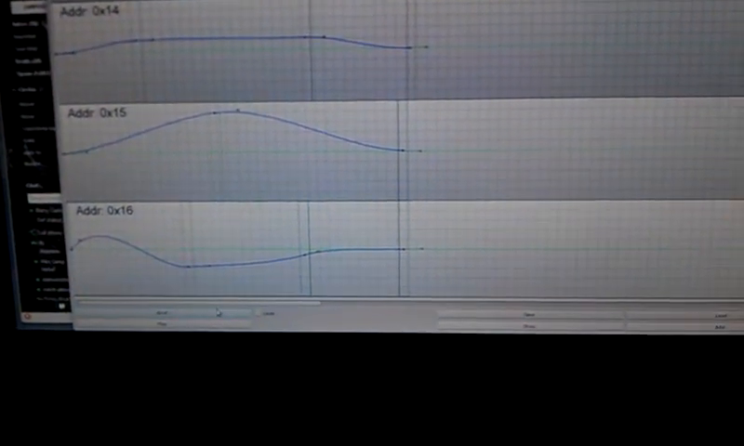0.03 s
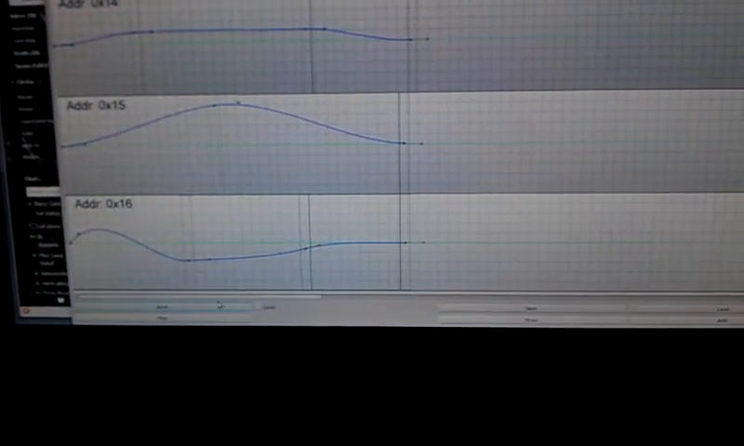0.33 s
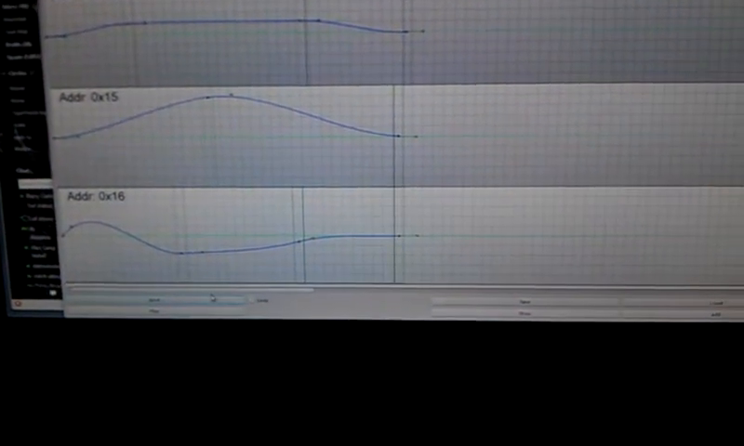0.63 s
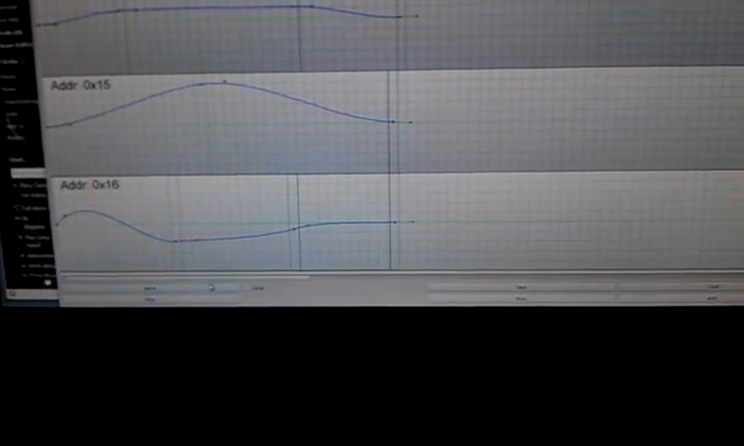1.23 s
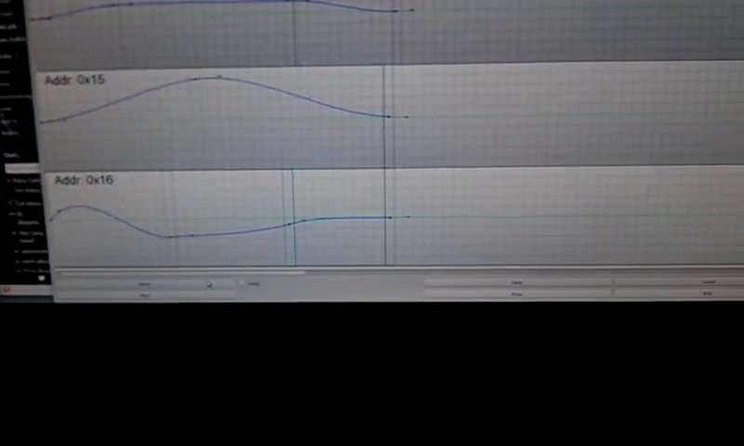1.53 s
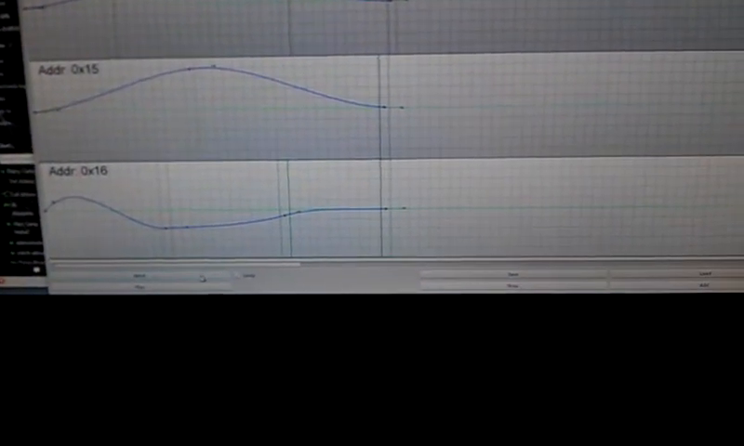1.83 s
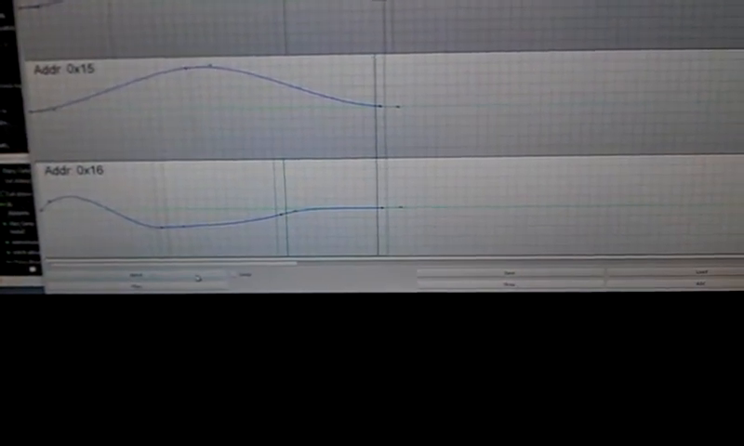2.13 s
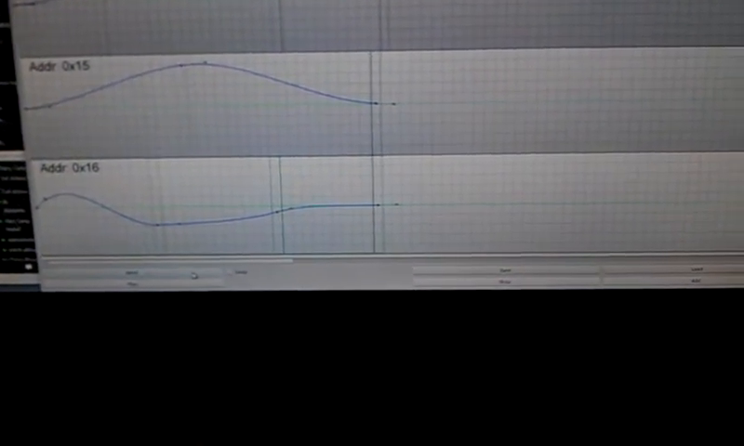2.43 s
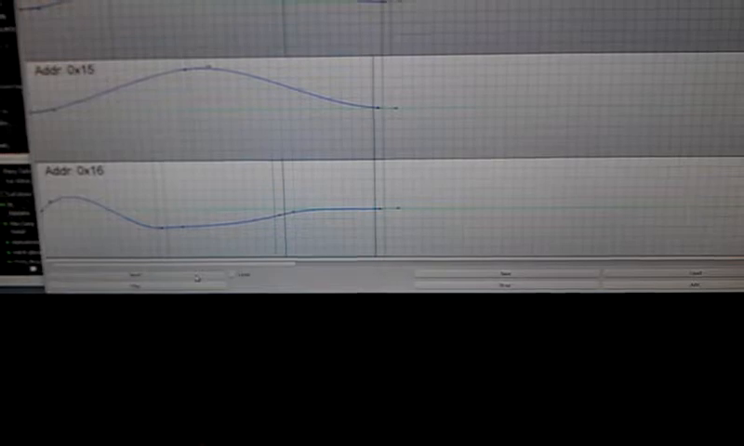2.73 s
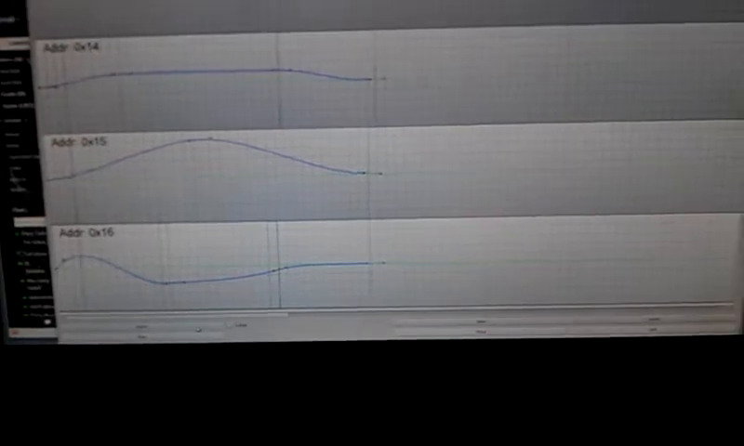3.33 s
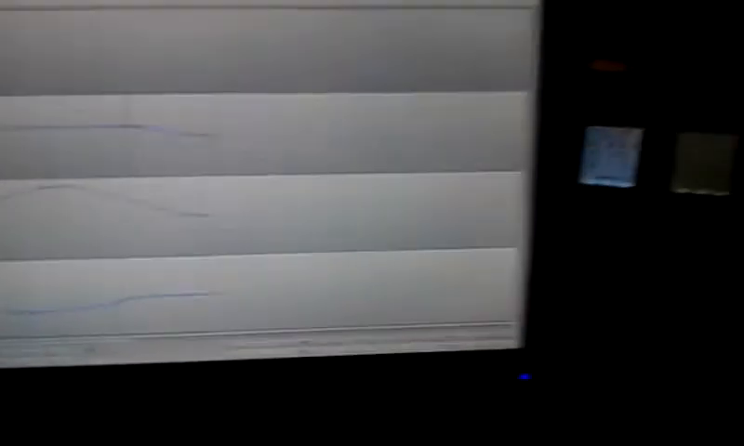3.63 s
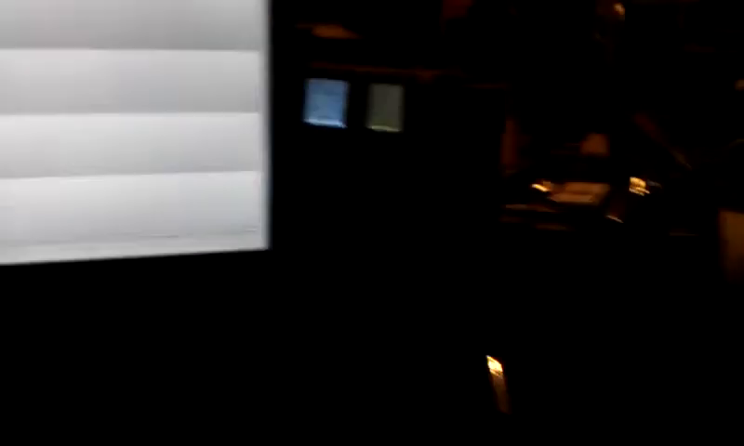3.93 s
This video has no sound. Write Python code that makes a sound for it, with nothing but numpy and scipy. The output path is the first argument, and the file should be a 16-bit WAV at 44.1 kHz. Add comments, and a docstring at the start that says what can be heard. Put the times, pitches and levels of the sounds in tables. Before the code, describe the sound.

Small servo motors start up with a loud whine, following soft hiss and light clicks.

```python
"""Servo motors of a small robot arm

A fan hums in a quiet room. After a few light plastic clicks, three geared servo motors spin up in turn.
Each whines at the harmonics of its shaft speed, shaped by the resonances of the housing, while the gear
teeth rattle and the drivers add a thin switching tone. The first motor slows again; the others run on."""
import sys
import numpy as np
from scipy import signal
from scipy.fft import rfft, irfft, next_fast_len
from scipy.io import wavfile
from scipy.ndimage import map_coordinates

SR = 44100
rng = np.random.default_rng(int(sys.argv[2]) if len(sys.argv) > 2 else 0)


def wav_out(sig):
    """Save sig, one row per channel (or a flat mono array), as 16-bit PCM at SR to the path in sys.argv[1]."""
    wavfile.write(sys.argv[1], SR, np.round(np.clip(np.atleast_2d(sig).T, -1, 1) * 32767).astype(np.int16))


N = 176400

# Shaft speed of each motor: time_s, speed_hz
SPEED_A = [(3.02, 250), (3.14, 535), (3.235, 688), (3.275, 703), (3.36, 707), (3.56, 699), (3.705, 697),
           (3.755, 652), (3.81, 573), (3.87, 487), (3.945, 392), (4.0, 380)]
SPEED_B = [(3.17, 330), (3.26, 513), (3.35, 675), (3.42, 722), (3.48, 729), (3.62, 721.5), (3.83, 711.5),
           (4.0, 702)]
SPEED_C = [(3.05, 560), (3.17, 617), (3.3, 629), (3.55, 634), (4.0, 641)]
# Envelope of each whine: time_s, gain_db
ENVELOPE_A = [(3.02, -27), (3.15, -11.5), (3.21, -11.5), (3.255, -2), (3.38, 0), (3.45, -5.5), (3.55, 0),
              (3.69, -1), (3.79, -7.5), (3.87, -5.5), (3.92, -7), (3.96, -4.5), (4.0, -11)]
ENVELOPE_B = [(3.17, -23), (3.26, -12), (3.32, -26), (3.41, -3), (3.66, 0), (3.77, -4), (3.88, 0.5),
              (4.0, 3)]
ENVELOPE_C = [(3.05, -32), (3.17, -3.5), (4.0, 2.5)]
# Harmonics of each shaft: harmonic_number, gain_db
HARMONICS_A = [(1, 6.5), (2, 2), (3, 11), (4, 4.5), (5, 5.5), (7, 1), (8, 2.5), (10, -3), (11, 0), (12, 4)]
HARMONICS_B = [(1, 11), (2, 15.5), (3, -0.5), (4, 7.5), (6, 5.5), (12, 0), (13, 0)]
HARMONICS_C = [(2, 9), (4, 0.5), (9, -0.5), (10, -4)]
# Broad response of the arm's housing: frequency_hz, gain_db
HOUSING_RESPONSE = [(170, -63), (275, -11.5), (400, -32), (530, -19.5), (710, -19), (900, -21),
                    (1250, -11.5), (1400, -24.5), (1455, -8), (1600, -8.5), (1930, -3), (2200, 0),
                    (2600, -9), (3150, -12.5), (4100, -12.5), (4400, -5), (4950, -3.5), (5400, -11),
                    (5690, -4.5), (5900, -6.5), (7100, 0), (8500, 3), (9400, -3.5), (10900, -13),
                    (13000, -12), (14200, -19), (16000, -34)]
# Narrow modes of the housing: frequency_hz, lift_db
HOUSING_MODES = [(1945, 3.5), (2110, 1.5), (2370, 8.5), (2555, 6.5), (4322, 7.5), (4374, 6.5)]
# Envelopes of the gear rattle below and above SPLIT_HZ: time_s, gain_db
MIDS_ENVELOPE = [(3.02, -65), (3.04, -52.5), (3.1, -49.5), (3.15, -47), (3.3, -43), (3.5, -44),
                 (3.7, -40.5), (4.0, -42.5)]
TREBLE_ENVELOPE = [(3.0, -57), (3.18, -37), (3.33, -32.5), (4.0, -32)]
# Plastic clicks: start_s, level_db, ring_hz, ring_gain_db, knock_hz, knock_gain_db, snap_gain_db
CLICKS = [(0.1785, -55.5, 3300, 6, 1760, -4, -3), (0.1856, -50.5, 7400, 7, 4760, -2, 1),
          (0.2019, -49.5, 7460, 1, 2400, -8, 2), (.887, -51, 6630, 10, 2620, 2, 6.5),
          (2.1524, -50.5, 7600, 6, 1900, -5, 2), (2.1595, -45.5, 8450, 5, 3920, -10, -1),
          (2.1674, -45.5, 8100, 0, 6200, -11, -4), (2.4177, -51.5, 6700, 2, 980, 6, 7),
          (2.6218, -49, 3830, 3.5, 6400, -6, 6.5), (2.7637, -54, 8380, 16.5, 6160, 6, 10),
          (2.996, -52.5, 7200, 5, 6600, 5, -16)]
# Spectrum of a click's crack: frequency_hz, gain_db
CRACK_SPECTRUM = [(500, -34), (2000, -6.5), (5000, -8.5), (8300, 3.5), (11000, -12), (16000, -36)]
# Spectrum of the fan's air noise: frequency_hz, gain_db
AIR_SPECTRUM = [(25, -10), (86, -12), (125, -7.5), (160, -8.5), (390, -7.5), (620, -7), (1000, -3),
                (1320, -3), (1510, -9), (1930, -9.5), (2810, -16.5), (6660, -17.5), (8050, -15),
                (9210, -19.5), (13800, -22)]
# Tones of the fan: pitch_hz, level_db
FAN_TONES = [(120, -77), (485, -70)]

WHINE_DB, FLUTTER, RASP = -43, 0.0009, 0.11  # base level; scales of speed waver and of fast roughness
FLICKER_DB, STRAIN_DB = 2.5, 2.5  # unsteadiness of each harmonic; extra on speeding up or braking
FOCUS = 1.414  # exponent: the housing picks out tones more sharply than rattle
POWER_ON_S, IMPACTS_PER_S, SHAFT_SWING = 2.997, 9000, 0.22
GEAR_RATIO, WEAR_DB = 6.2, -5.5  # shaft turns per gear turn; tooth errors relative to impacts
SPLIT_HZ, MIDS_DB, TREBLE_DB = 3130, -1.86, -2.5
DRIVER_HZ, DRIVER_DB = 9787, -56
AIR_DB, HISS_DB = -58, -71.5
ROOM_T60_S, GLIDE_WET_DB, GEAR_WET_DB, CLICK_WET_DB = 0.17, -5.5, -7, -3
TOP_HZ = 15900


def motor(speed, envelope, harmonics):
    """Forced vibration: shaft harmonics swell as they cross housing resonances; echoes blur the glides."""
    shaft_hz = curve(speed)
    wavering_hz = shaft_hz * (1 + FLUTTER * (wobble(45) + 2 * wobble(400)))
    angle = 2 * np.pi * np.cumsum(wavering_hz) / SR
    strain = np.minimum(np.abs(np.gradient(shaft_hz)) * SR / 1000, 1)  # full at 1000 Hz per second
    flicker_db = FLICKER_DB + STRAIN_DB * strain
    partials = np.zeros(N)
    for number, gain_db in harmonics:
        gain = amp(gain_db + flicker_db * wobble(40)) * housing(number * wavering_hz) ** FOCUS
        partials += gain * np.sin(number * angle + rng.uniform(0, 2 * np.pi))
    roughness = 1 + RASP * wobble(350)
    whine = switch_on(speed[0][0]) * amp(WHINE_DB + curve(envelope)) * roughness * partials
    blurred = room(strain * whine, GLIDE_WET_DB) / np.hypot(1, amp(GLIDE_WET_DB))
    return (1 - strain) * whine + blurred


def gear_rattle():
    """Impact excitation: random tooth strikes ring the housing, swelling once a turn of shaft B."""
    angle = 2 * np.pi * np.cumsum(curve(SPEED_B)) / SR
    impacts = (rng.random(N) < IMPACTS_PER_S / SR) * rng.choice([-1, 1], N)
    force = unit(impacts) + amp(WEAR_DB) * (worn_gear(SPEED_A) + worn_gear(SPEED_B))
    force = force * (1 + SHAFT_SWING * np.sin(angle)) * amp(0.6 * wobble(110))
    lowpass = lambda hz: 1 / (1 + (hz / SPLIT_HZ) ** 8)
    mids = unit(filtered(force, lambda hz: housing(hz) * lowpass(hz)))
    treble = unit(filtered(force, lambda hz: housing(hz) * (1 - lowpass(hz))))
    mids *= amp(MIDS_DB + curve(MIDS_ENVELOPE))
    treble *= amp(TREBLE_DB + curve(TREBLE_ENVELOPE))
    return switch_on(POWER_ON_S) * (mids + treble)


def worn_gear(speed):
    """Periodic excitation: uneven teeth repeat one rasp every gear turn, a comb of fine partials."""
    tooth_errors = rng.standard_normal(420)
    turns = np.cumsum(curve(speed)) / SR / GEAR_RATIO
    return unit(map_coordinates(tooth_errors, [turns % 1 * len(tooth_errors)], mode="grid-wrap"))


def housing(hz):
    """Modal resonance: the gain of the housing is its broad response, lifted at each narrow mode."""
    modes_db = sum(lift_db * band(mode_hz, half_width_hz=16.5)(hz) for mode_hz, lift_db in HOUSING_MODES)
    return spectrum(HOUSING_RESPONSE, hz) * amp(modes_db)


def drivers():
    """Switching at a fixed rate: the motor drivers give a thin pure tone once they have power."""
    return switch_on(POWER_ON_S) * amp(DRIVER_DB) * np.sin(2 * np.pi * DRIVER_HZ * np.arange(N) / SR)


def clicks():
    """Damped vibration: each click is a snap, a crack, a ring and a knock, decaying exponentially."""
    out, t = np.zeros(N + SR), np.arange(SR // 10) / SR
    burst = lambda response, t60_s: noise(response, len(t)) * amp(-60 * t / t60_s)
    for start_s, level_db, ring_hz, ring_db, knock_hz, knock_db, snap_db in CLICKS:
        snap = amp(snap_db) * burst(band(8400, half_width_hz=5600), t60_s=0.0097)
        crack = burst(lambda hz: spectrum(CRACK_SPECTRUM, hz), t60_s=0.072)
        ring = amp(ring_db) * burst(band(ring_hz, half_width_hz=710), t60_s=0.042)
        knock = amp(knock_db) * burst(band(knock_hz, half_width_hz=170), t60_s=0.036)
        out[round(start_s * SR):][:len(t)] += amp(level_db) * (snap + crack + ring + knock)
    return out[:N]


def fan():
    """Broadband and tonal noise: moving air, two slightly unsteady hums and a narrow band of hiss."""
    t = np.arange(N) / SR
    air = amp(AIR_DB + 0.36 * wobble(7.88)) * noise(lambda hz: spectrum(AIR_SPECTRUM, hz), N)
    hum = sum(amp(level_db + 0.24 * wobble(7)) * np.sin(2 * np.pi * pitch_hz * t + 0.66 * wobble(6))
              for pitch_hz, level_db in FAN_TONES)
    hiss = amp(HISS_DB) * noise(band(8080, half_width_hz=420), N)
    return air + hum + hiss


def room(x, wet_db):
    """Reverberation: the direct sound plus its convolution with a small room's decaying tail."""
    t = np.arange(SR // 3) / SR
    tail = rng.standard_normal(len(t)) * amp(-60 * t / ROOM_T60_S) * (t > .003)
    return x + amp(wet_db) * signal.fftconvolve(x, tail / np.linalg.norm(tail))[:N]


def amp(db):
    """The decibel scale: level to amplitude ratio."""
    return 10 ** (np.asarray(db) / 20)


def unit(x):
    """Normalisation to rms 1."""
    return x / np.sqrt(np.mean(x ** 2) + 1e-20)


def spectrum(points, hz):
    """Log-frequency interpolation: the gain at hz from rows of frequency_hz, gain_db."""
    frequency_hz, gain_db = np.transpose(points)
    return amp(np.interp(np.log(hz + 1), np.log(frequency_hz + 1), gain_db))


def curve(points):
    """Linear interpolation: one value per sample from rows of time_s, value."""
    return np.interp(np.arange(N) / SR, *np.transpose(points))


def switch_on(start_s):
    """Gating: a ramp from 0 to 1 in 3 ms."""
    return np.clip((np.arange(N) / SR - start_s) / .003, 0, 1)


def wobble(rate_hz):
    """Random modulation: a smooth curve through rate_hz random knots a second."""
    knots = rng.standard_normal(int(N * rate_hz / SR) + 4)
    return map_coordinates(knots, [np.arange(N) * rate_hz / SR], order=2)


def filtered(x, response):
    """Zero-phase filtering: the spectrum of x times a response of frequency."""
    size = next_fast_len(len(x) + 8192)
    return irfft(rfft(x, size) * response(np.fft.rfftfreq(size, 1 / SR)), size)[:len(x)]


def noise(response, size):
    """Spectral shaping: white noise coloured by a response, at rms 1."""
    return unit(filtered(rng.standard_normal(size), response))


def band(centre_hz, half_width_hz):
    """Resonance: a Lorentzian peak of gain against frequency."""
    return lambda hz: 1 / (1 + ((hz - centre_hz) / half_width_hz) ** 2)


def scene():
    """Superposition: clicks, then the moving arm, over the fan."""
    clicking = room(clicks(), CLICK_WET_DB)
    rattle = room(gear_rattle(), GEAR_WET_DB)
    whine = (motor(SPEED_A, ENVELOPE_A, HARMONICS_A)
             + motor(SPEED_B, ENVELOPE_B, HARMONICS_B)
             + motor(SPEED_C, ENVELOPE_C, HARMONICS_C))
    return (whine + rattle + drivers() + clicking + fan())[None]


def record(dry):
    """Band limiting: nothing above TOP_HZ passes."""
    return filtered(dry[0], lambda hz: hz < TOP_HZ)[None]


dry = scene()
out = record(dry)
wav_out(out)
```